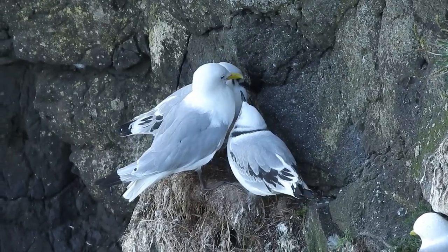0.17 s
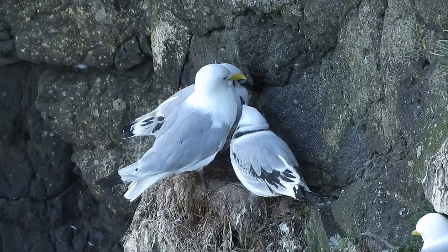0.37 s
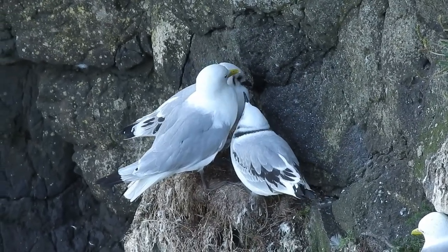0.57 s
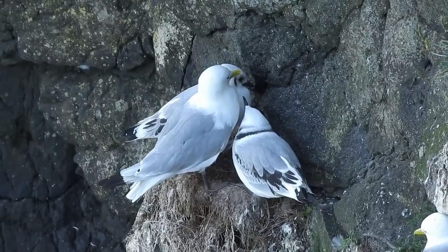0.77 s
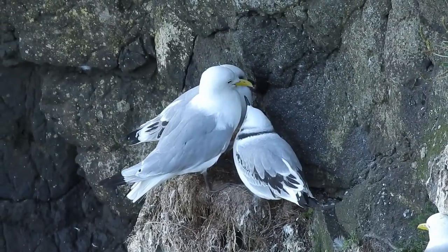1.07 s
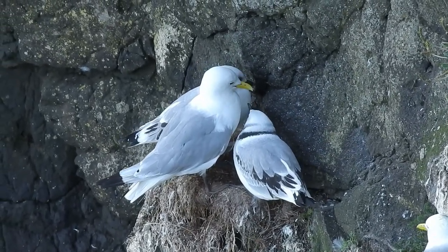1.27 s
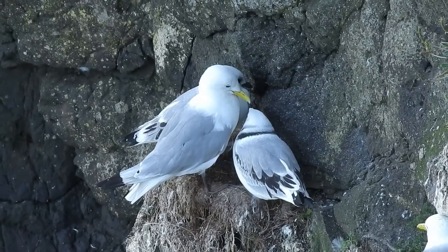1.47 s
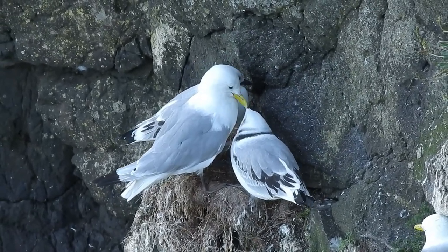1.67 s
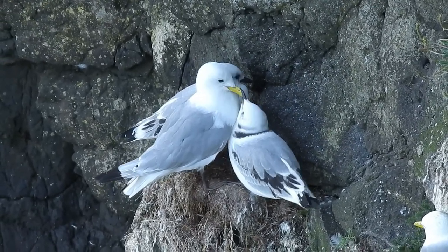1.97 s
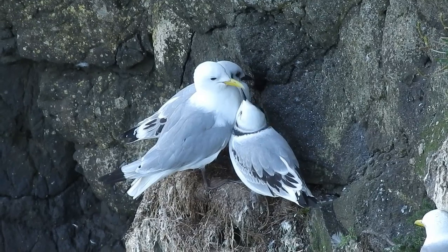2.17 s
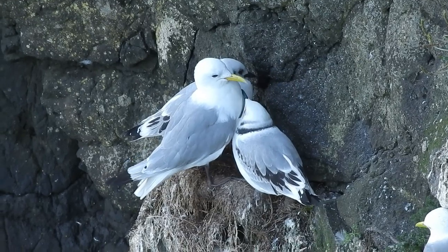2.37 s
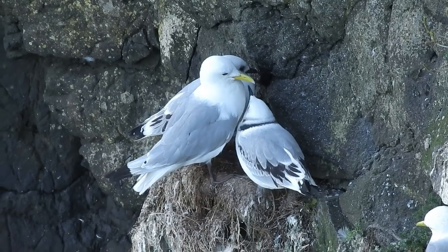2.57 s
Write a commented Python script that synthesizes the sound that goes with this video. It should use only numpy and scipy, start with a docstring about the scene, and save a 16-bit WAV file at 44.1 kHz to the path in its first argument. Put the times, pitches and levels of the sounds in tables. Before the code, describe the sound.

Overlapping nasal gull cries from a cliff colony, with wind bumping the microphone and a steady wash

```python
"""Kittiwakes call over one another on a sea cliff, some near, many far, heard at two microphone ports.
Each call is a gliding stack of partials shaped by throat resonances, with sparse echoes off the rock.
The far colony and the surf blur into a wash of noise with drifting patches.
Lumpy low noise and soft knocks are the wind at the ports; a steady hiss lies beneath."""
import sys
import numpy as np
from scipy import signal
from scipy.fft import rfft, irfft
from scipy.io import wavfile
from scipy.ndimage import uniform_filter1d

SR = 44100
rng = np.random.default_rng(int(sys.argv[2]) if len(sys.argv) > 2 else 0)


def master_out(mix):
    """Clip the mix to full scale and print it as 16-bit PCM to the path in sys.argv[1]."""
    frames = np.transpose(np.atleast_2d(mix))
    ceiling = np.clip(frames, -1, 1)
    pcm = np.round(ceiling * 32767).astype(np.int16)
    wavfile.write(sys.argv[1], SR, pcm)


def undo_db(level):
    """Turn decibels back into plain size, where 20 dB means ten times bigger."""
    steps = np.asarray(level, float) / 20
    return 10 ** steps


N = 119952  # length in samples


def evened(x):
    """Scales to rms 1."""
    return x / np.sqrt(np.mean(x ** 2) + 1e-20)


def read(points, hz):
    """Reads a table on a log-frequency axis."""
    f, value = np.transpose(points)
    return np.interp(np.log(hz + 1), np.log(f + 1), value)


def add(mix, start_s, sound):
    """Mixes a two-channel sound in at start_s, cut off at the end of the mix."""
    part = mix[:, round(start_s * SR):][:, :sound.shape[1]]
    part += sound[:, :part.shape[1]]


def drift(shape, top_hz):
    """Slow chance below about top_hz, rms near 1: random knots joined by lines along the last axis."""
    step = SR / 2 / top_hz
    knots = rng.standard_normal((shape[0], 400))
    position = np.arange(shape[1]) / step
    return 1.28 * np.array([np.interp(position, np.arange(400), row) for row in knots])


# colour of the microphone hiss: frequency_hz, relative_density_db
HISS_COLOUR = [(5000, -30.5), (7500, -2), (12000, -6.5), (15500, -9.5)]


def hiss():
    """Steady noise of the two microphones, unrelated, coloured in the spectrum."""
    level_db = -64
    spectrum = rfft(rng.standard_normal((2, N)))
    spectrum = spectrum * undo_db(read(HISS_COLOUR, np.fft.rfftfreq(N, 1 / SR)))
    return undo_db(level_db) * evened(irfft(spectrum, N))


# course of the gusts: time_s, buffeting_level_db, rumble_level_db
GUSTS = [(0, -53, -45), (.3, -66.5, -49.5), (.65, -69, -49.5), (0.849, -54.5, -59), (1.15, -46.5, -68),
         (1.499, -40, -58.5), (1.801, -44.5, -54.5), (2.151, -49.5, -70), (2.72, -64, -69)]


def wind():
    """Lumpy low noise, mostly unrelated at the two ports, in two bands that follow the gusts."""
    lump_db, lump_hz = 5.0, 15
    t = np.arange(N) / SR
    s, buffet_db, rumble_db = np.transpose(GUSTS)
    out = 0
    for level_db, lo_hz, hi_hz in ((buffet_db, 110, 330), (rumble_db, 52, 95)):
        noise = rng.standard_normal((3, N))
        ports = noise[1:] + .5 * noise[0]  # a little of the noise is shared
        bandpass = signal.butter(2, [lo_hz, hi_hz], "band", fs=SR, output="sos")
        lumpy = signal.sosfilt(bandpass, ports) * undo_db(lump_db * drift((2, N), lump_hz))
        out = out + undo_db(np.interp(t, s, level_db)) * evened(lumpy)
    return out


# gusts knocking the ports: start_s, envelope_peak_db, pitch_hz
KNOCKS = [(0.91, -29.5, 140), (1.05, -36.5, 210), (1.269, -27, 152), (1.448, -29.5, 321), (1.598, -27, 202),
          (1.668, -30, 269), (1.75, -32, 127)]


def thumps():
    """Gusts push the ports unevenly: a low sine swells and dies, its phase random at each port."""
    rise_s = 0.007
    mix = np.zeros((2, N))
    t = np.arange(SR // 10) / SR
    swell = t / rise_s * np.exp(1 - t / rise_s)
    for (start_s, peak_db, hz), turn in zip(KNOCKS, rng.random((len(KNOCKS), 2))):
        tone = np.sin(2 * np.pi * (hz * t + turn[:, None]))
        add(mix, start_s, undo_db(peak_db) * swell * tone)
    return mix


# swell of the far colony, of which only the swing about the mean is used: time_s, level_db
COLONY_SWELL = [(0, -30), (.65, -31.5), (.72, -34.5), (.8, -31.5), (.88, -36), (.96, -32.5), (1.3, -30.5),
                (1.5, -33), (1.901, -32.5), (2.15, -32.5), (2.72, -33.5)]


def colony_swell_db(t):
    """Swell of the far colony about its mean."""
    s, level_db = np.transpose(COLONY_SWELL)
    return np.interp(t, s, level_db - level_db.mean())


# colour of surf and colony through the microphone, also laid over every call:
# frequency_hz, relative_density_db
WASH_COLOUR = [(35, -48.5), (60, -24.5), (157, -2.5), (240, -6.5), (439, -5.5), (656, -5.5), (887, -9),
               (1110, -6), (1250, -1.5), (1500, -7.5), (2060, -7), (2730, 0.5), (3020, -2.5), (3340, 0),
               (4010, -13), (5000, -6.5), (5640, -6), (7320, -26), (9520, -55.5), (16100, -120)]
# likeness of the wash at the two ports, 1 being identical: frequency_hz, likeness
LIKENESS = [(60, 0.29), (120, 0.61), (230, 0.95), (460, 0.98), (900, 0.98), (1770, 0.87), (3490, 1),
            (6870, 0.053)]
# phase by which the left port leads the right: frequency_hz, lead_rad
PORT_LEAD = [(1700, 0.088), (3700, 0.4), (4300, 0.98), (5300, 1.1), (6200, 1.43), (6900, 0.22)]
# left level minus right level: frequency_hz, difference_db
PORT_TILT = [(50, 0), (1000, -0.5), (3500, 0), (6000, -3.5)]


def wash():
    """Surf and blurred colony: random spectra whose middle band has drifting patches of loudness."""
    level_db, patch_db, swell_share = -29.5, 3.43, 1.03
    surf_share = 0.16  # the low wash rises with the gusts, dB per dB
    hop, size = 256, 1024
    frames = N // hop + 5
    t = np.arange(frames) * hop / SR
    hz = np.fft.rfftfreq(size, 1 / SR)[:, None]
    a, b, c, d, patches = rng.standard_normal((frames, 513, 5)).T
    patches = uniform_filter1d(patches, 6, 0)
    patches = evened(uniform_filter1d(patches, 12, 1))

    same = np.clip(read(LIKENESS, hz), -1, 1)
    left = a + 1j * b
    right = same * left + np.sqrt(1 - same ** 2) * (c + 1j * d)
    right = right * np.exp(-1j * read(PORT_LEAD, hz))
    side_db = read(PORT_TILT, hz) / 2
    z = np.array([left * undo_db(side_db), right * undo_db(-side_db)])

    s, gust_db, _ = np.transpose(GUSTS)
    surf_band = 1 / (1 + (hz / 1300) ** 4)
    z *= undo_db(surf_share * surf_band * np.interp(t, s, gust_db - gust_db.mean()))
    bird_band = 1 / (1 + (1500 / (hz + 1)) ** 4) / (1 + (hz / 7500) ** 8)
    bird_db = bird_band * (patch_db * patches + swell_share * colony_swell_db(t))
    z *= undo_db(read(WASH_COLOUR, hz) + bird_db)
    sound = signal.istft(z, nperseg=size, noverlap=size - hop)[1][:, :N]
    return undo_db(level_db) * evened(sound)


def call(curve, throat_hz, lift_db, treble_db, flutter_db=0, upper_hz=5700, upper_db=-4,
         flutter_hz=63.4, flicker_db=2.5):
    """Partials of a wavering pitch, shaped by the throat; the ports hear them with a phase lead."""
    lift_oct, treble_from_hz, edge_s = 0.16, 4270, 0.0029
    waver_share, chance_hz = .0012, 30  # pitch wobble as a share of the pitch; top rate of the chance
    low_hz, low_db = 1494, -7.5  # the throat weakens partials under low_hz
    s, pitch_hz, level_db, *odd_db = np.transpose(curve)
    t = np.arange(s[0], s[-1], 1 / SR)
    k = np.arange(1, 16)[:, None]  # partial numbers
    chance = drift((16, len(t)), chance_hz)
    glide_hz = uniform_filter1d(np.interp(t, s, pitch_hz), 400, mode="nearest")
    f0 = glide_hz * (1 + waver_share * chance[0])
    hz = k * f0

    db = read(WASH_COLOUR, hz) + lift_db * np.exp(-(np.log2(hz / throat_hz) / lift_oct) ** 2)
    db = db + treble_db / (1 + (treble_from_hz / hz) ** 8)
    db = db + upper_db * np.exp(-(np.log2(hz / upper_hz) / lift_oct) ** 2)
    db = db + low_db / (1 + (hz / low_hz) ** 8)
    if odd_db:  # the voice doubles: odd partials come and go
        db = db + k % 2 * np.interp(t, s, odd_db[0])
    # every partial but the strongest of the moment flickers on its own
    flicker = flicker_db * chance[1:] * (db < db.max(0))
    db = db - db.mean(1).max() + flicker

    turn = 2 * np.pi * (k * np.cumsum(f0) / SR + rng.random((15, 1)))
    edge = np.clip(np.minimum(t - s[0], s[-1] - t) / edge_s, 0, 1)
    throb_db = flutter_db * np.sin(2 * np.pi * flutter_hz * t)
    loudness = edge * undo_db(np.interp(t, s, level_db) + throb_db) * np.sqrt(2)  # sine peak from rms
    side_db, lead = read(PORT_TILT, hz) / 2, read(PORT_LEAD, hz) / 2
    ports = [(undo_db(db + c * side_db) * np.sin(turn + c * lead)).sum(0) for c in (1, -1)]
    return s[0], loudness * np.array(ports)


def cliff(x, t60):
    """Echoes off the rock: sparse taps of random sign, mostly shared by both ports."""
    n = SR // 2
    signs = rng.choice([-1., 1.], (3, n))
    sparse = rng.random((3, n)) < .04
    taps = signs * sparse * undo_db(-60 * np.arange(n) / SR / t60)
    taps[:, :300] = 0  # no echo in the first 7 ms
    taps = taps[0] + 0.061 * taps[1:]
    return signal.fftconvolve(x, taps / np.linalg.norm(taps[0]), axes=1)[:, :N]


def far_birds(count=90):
    """Many distant calls at random moments and pitches, blurred by echo, swelling as one colony."""
    level_db, echo_t60_s = -35.5, .4
    mix = np.zeros((2, N))
    for a, b, c, d, e, f, g in rng.random((count, 7)):
        s, length = a * N / SR, 0.06204 + .16 * b
        hz = 600 * (1 + .15 * c) * (1.45 if d > .7 else 1)  # three in ten are higher voices
        curve = [(s, hz * (.94 + .12 * e), -4),
                 (s + length / 2, hz, 0),
                 (s + length, hz * (.94 + .12 * f), -4)]
        add(mix, *call(curve, 2100 + 1400 * g, 1.7, 0.54, flicker_db=7.5))
    mix = .45 * mix + cliff(mix, echo_t60_s)
    return undo_db(level_db + colony_swell_db(np.arange(N) / SR)) * evened(mix)


# long calls, one table each, the last column only where the voice doubles:
# time_s, pitch_hz, strongest_partial_db, odd_partials_lift_db
LONG_CALLS = [
    [(.17, 1296, -22), (.2, 1258, -28.5), (.25, 1211, -25), (.3, 1285, -25), (.345, 1337, -22),
     (.38, 1264, -25.5), (.42, 1231, -24.5), (.455, 1115, -27), (.485, 1073, -19)],
    [(.19, 626, -43), (.25, 613, -37.5), (.33, 663, -39.5), (.375, 686, -38), (.43, 650, -41),
     (.475, 648, -45)],
    [(.92, 774.4, -33.5), (.97, 795, -33.5), (1.02, 824, -42), (1.085, 856, -36), (1.1, 897, -33),
     (1.15, 868, -37)],
    [(1.16, 1019, -25), (1.185, 1031, -20), (1.245, 1038, -23), (1.272, 1044, -32)],
    [(1.73, 637, -38, -25), (1.79, 600, -29, -22), (1.83, 592, -31, -8), (1.87, 593, -35, 3),
     (1.93, 633, -33, -12)],
    [(1.908, 929, -34), (1.95, 940.5, -26.5), (2.015, 971.5, -26), (2.045, 956, -30), (2.068, 952, -36)],
    [(2.515, 595, -38), (2.58, 574.6, -32), (2.65, 561, -32.5), (2.72, 572, -32)],
]
# voice of each long call: throat_hz, throat_lift_db, treble_db, flutter_db, upper_hz, upper_lift_db
LONG_VOICES = [(2383, 18, -9, 1, 6600, 9), (3400, 9, 4, -1, 5350, 10), (2340, 9, 1, 0, 4850, 10),
               (2065, 21, 15.5, -0.5, 5150, -6.5), (2400, 7, 4.5, 1.5, 5800, 4),
               (1900, 13.5, 1, -1.5, 4750, 11), (2280, 20, 0, 3.5, 5100, 5)]
# one harsh cry that throbs quickly: time_s, pitch_hz, strongest_partial_db
HARSH_CRY = [(.747, 630, -30), (.765, 602, -29), (.78, 590, -29), (.79, 627, -29), (.806, 627, -29)]
# its voice: throat_hz, throat_lift_db, treble_db, flutter_db, upper_hz, upper_lift_db, flutter_hz
HARSH_THROAT = (2450, 19, 4, 3.5, 5250, 6, 88)
# short calls: start_s, length_s, middle_level_db, start_pitch_hz, middle_pitch_hz, end_pitch_hz,
# throat_hz, throat_lift_db, treble_db
SHORT_CALLS = [(0, 0.0726, -32.5, 615, 645, 626, 2480, 3.3, 1.5),
               (.08, 0.12, -27, 612, 584, 588, 2480, 30, -19),
               (.32, 0.15, -39, 635.5, 640, 652, 4470, 8.8, 13.5),
               (.803, 0.02, -26.5, 667, 680, 676, 2700, 13, 4),
               (.89, 0.078, -36, 693, 688, 694, 2060, 6.4, -6),
               (.965, .175, -30.5, 1237, 1217, 1296, 2440, 8.8, 7.5),
               (1.151, 0.27, -38, 620, 626, 655, 3630, 13.2, 15.5),
               (1.175, 0.042, -28, 908, 901, 880, 2750, 10.3, 16.5),
               (1.332, .065, -27.5, 885, 860, 826, 3400, 21, 10.5),
               (1.518, 0.061, -37, 626, 670, 670, 5350, 6, 6),
               (1.55, 0.1434, -30.5, 700, 716, 716, 2870, 14, 3),
               (1.7, .065, -38, 900, 882, 870, 2600, 1.9, 9), (1.775, .06, -38, 897, 850, 795, 2700, 1, 9),
               (2.302, 0.058, -34.5, 1140, 1250, 1238, 5000, 6, 0),
               (2.452, .14, -33, 1514, 1534, 1488, 2970, 24, -20),
               (2.462, .045, -28, 672, 645, 650, 2670, 32, -10),
               (2.58, 0.17, -34.5, 714.4, 717, 735, 2930, 5.2, 3)]
# very short peeps: start_s, length_s, pitch_hz, strongest_partial_db
SHORT_PEEPS = [(0.659, 0.022, 1165, -31), (2.298, 0.011, 1440, -33), (2.359, 0.015, 1357, -28),
               (2.404, 0.015, 1084, -31.5)]


def near_birds():
    """The calls and peeps that stand out: gliding partials through each throat, plus rock echo."""
    end_fade_db, echo_db, echo_t60_s = -5.5, -19, .25
    mix = np.zeros((2, N))
    for curve, voice in zip(LONG_CALLS, LONG_VOICES):
        add(mix, *call(curve, *voice))
    add(mix, *call(HARSH_CRY, *HARSH_THROAT))
    for s, length, level_db, first_hz, middle_hz, last_hz, *voice in SHORT_CALLS:
        u = np.linspace(0, 1, num=9)
        # the pitch bends along a parabola; the level sinks towards both ends
        bend = np.polyfit([0, .5, 1], [first_hz, middle_hz, last_hz], deg=2)
        pitch_hz = np.polyval(bend, u)
        arch_db = level_db + end_fade_db * (2 * u - 1) ** 2
        add(mix, *call(np.transpose([s + length * u, pitch_hz, arch_db]), *voice))
    for s, length, hz, level_db in SHORT_PEEPS:
        add(mix, *call([(s, hz, level_db), (s + length, hz, level_db)], 2 * hz, 19, -3))
    return mix + undo_db(echo_db) * cliff(mix, echo_t60_s)


def scene():
    """Hiss, wind, knocks, wash and birds far and near, summed."""
    return hiss() + wind() + thumps() + wash() + far_birds() + near_birds()


def roll_off(x):
    """The treble ends steeply here."""
    return signal.sosfilt(signal.butter(12, 15720, fs=SR, output="sos"), x)


def record(dry):
    """Takes the finished two-port mix to its stored form."""
    return roll_off(dry)


dry = scene()
out = record(dry)
master_out(out)
```